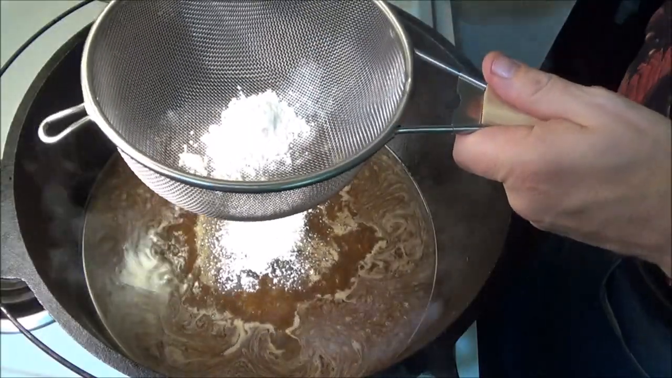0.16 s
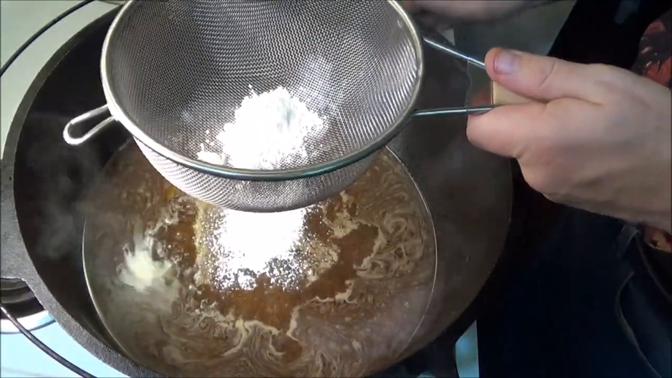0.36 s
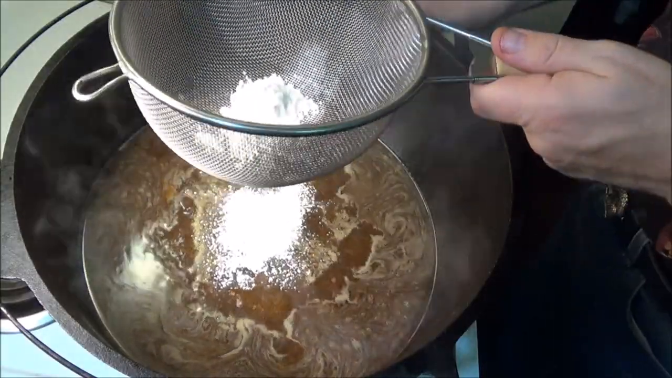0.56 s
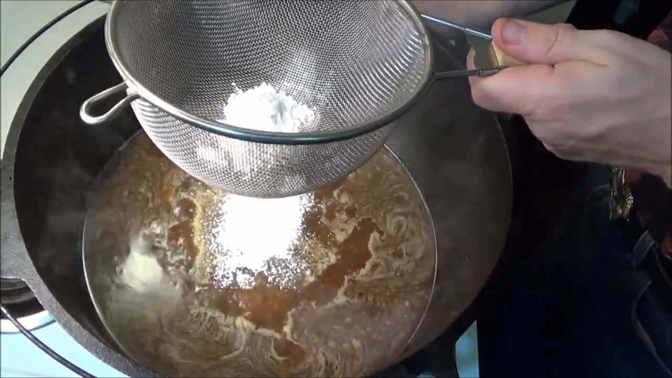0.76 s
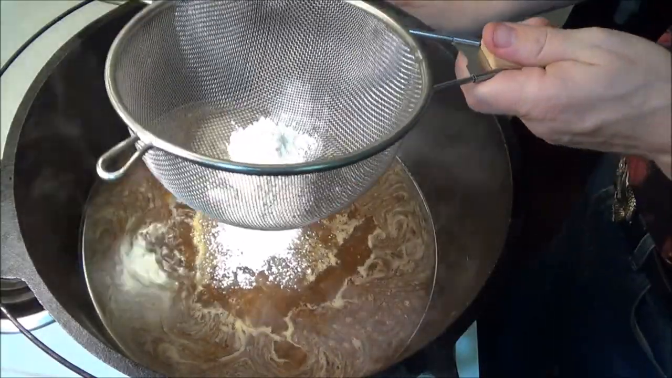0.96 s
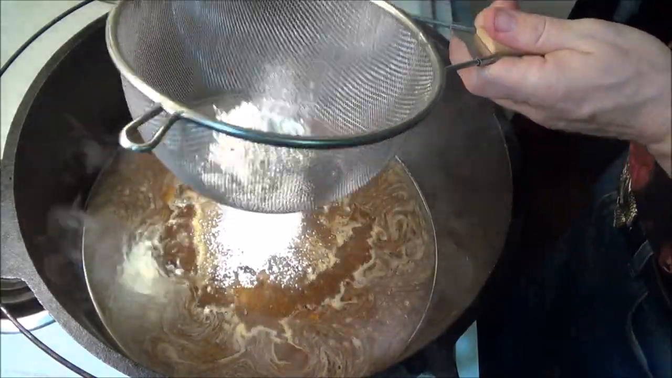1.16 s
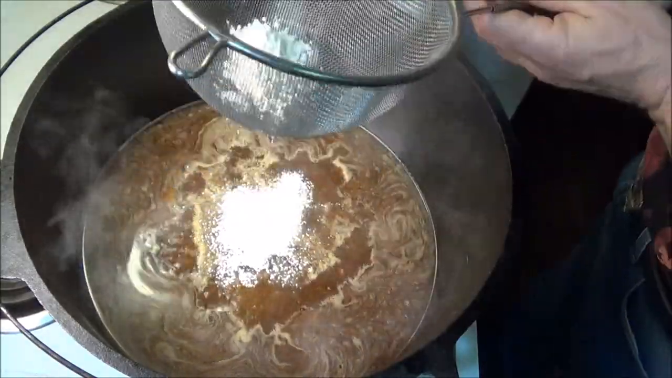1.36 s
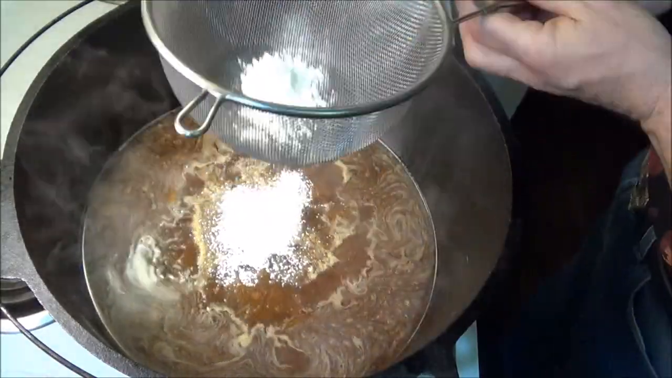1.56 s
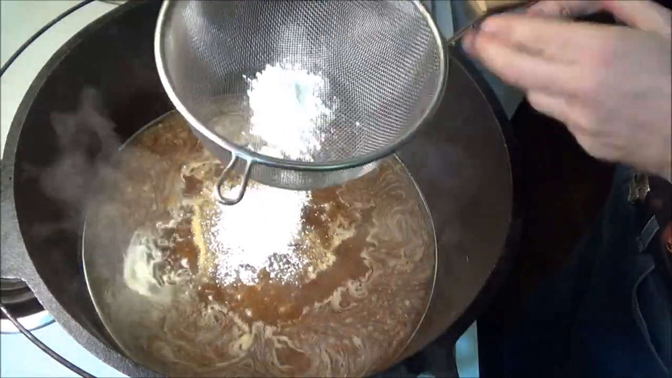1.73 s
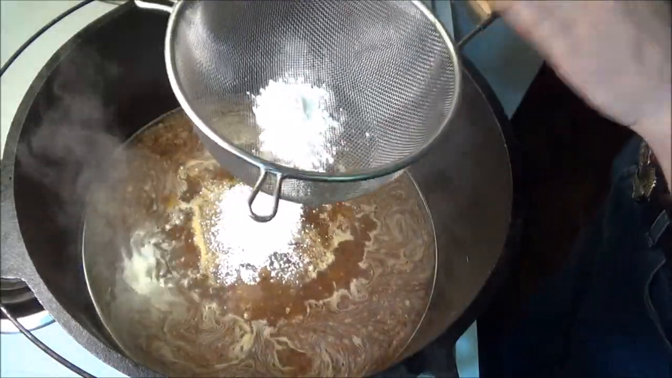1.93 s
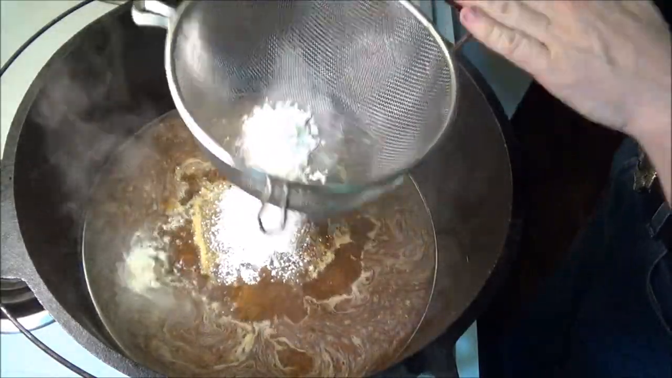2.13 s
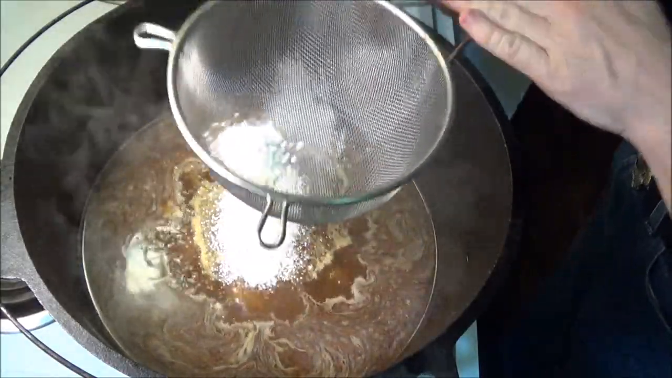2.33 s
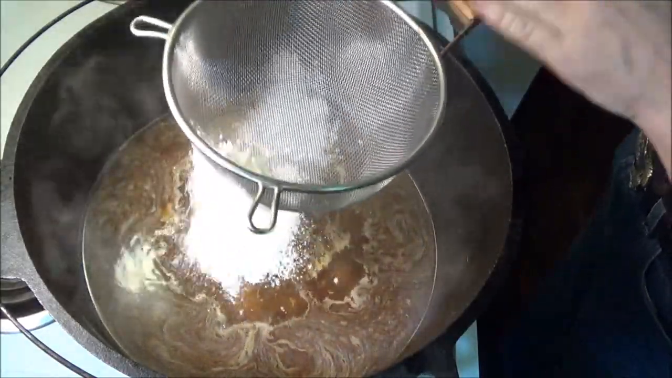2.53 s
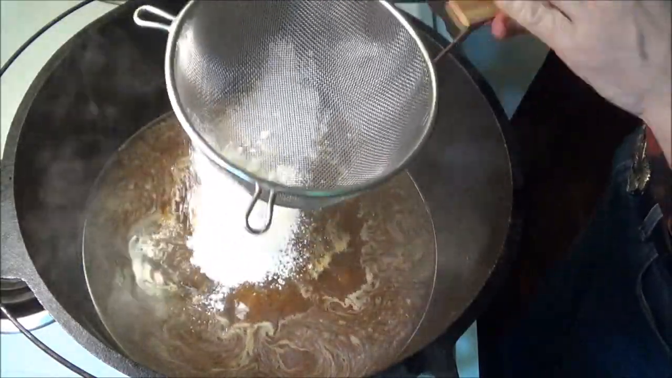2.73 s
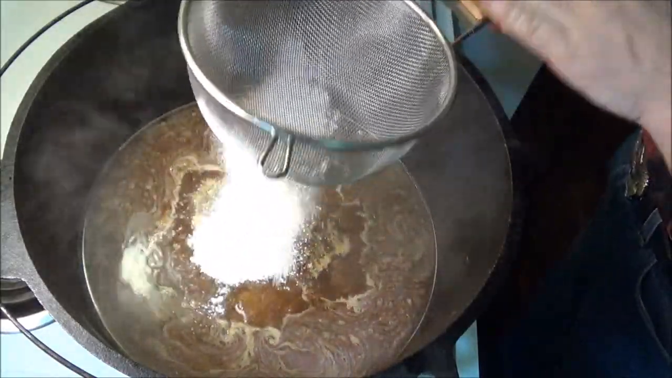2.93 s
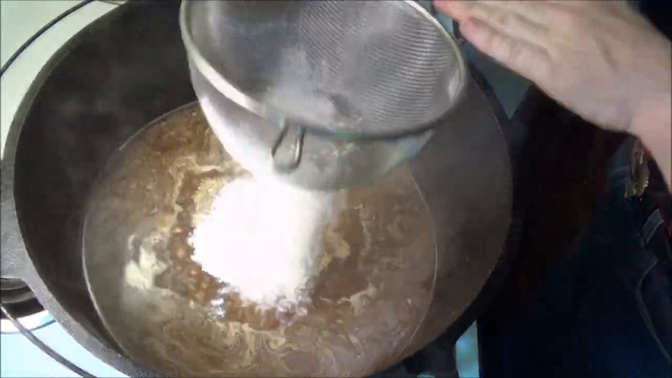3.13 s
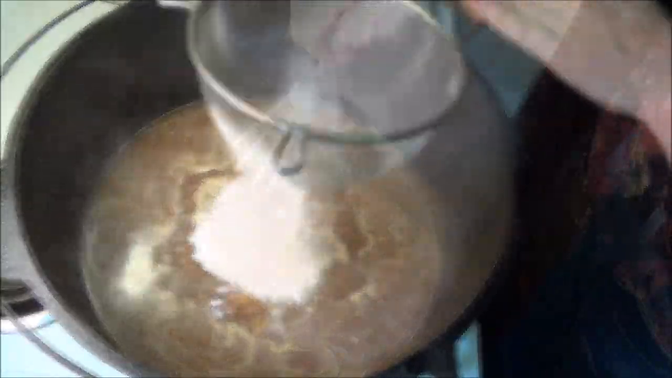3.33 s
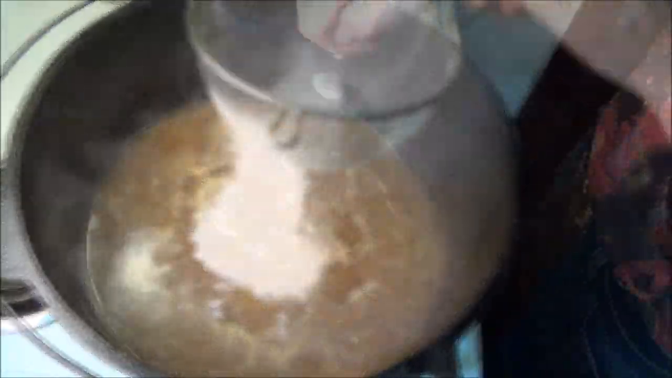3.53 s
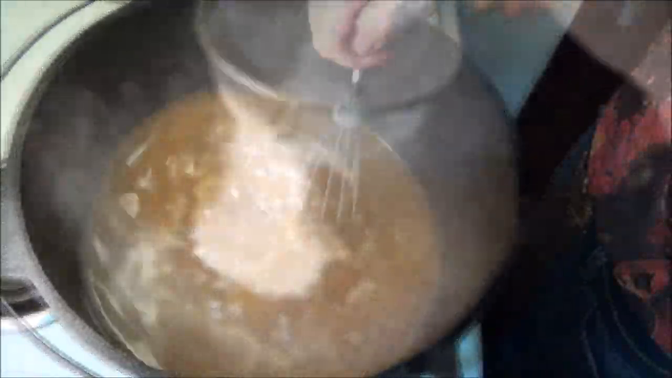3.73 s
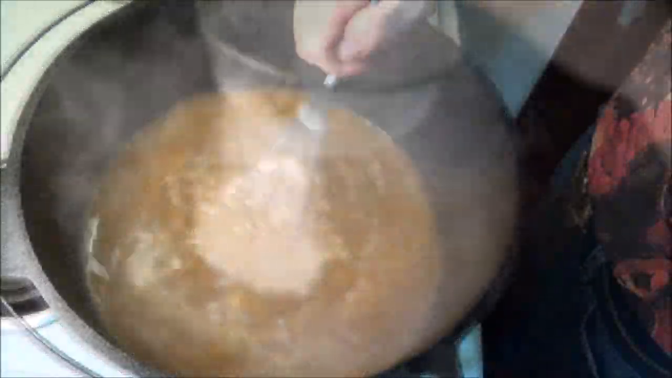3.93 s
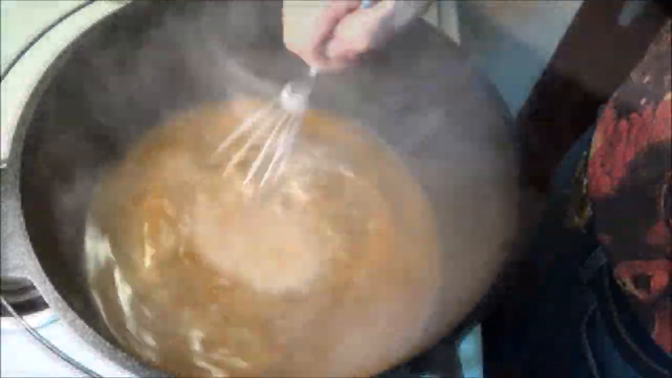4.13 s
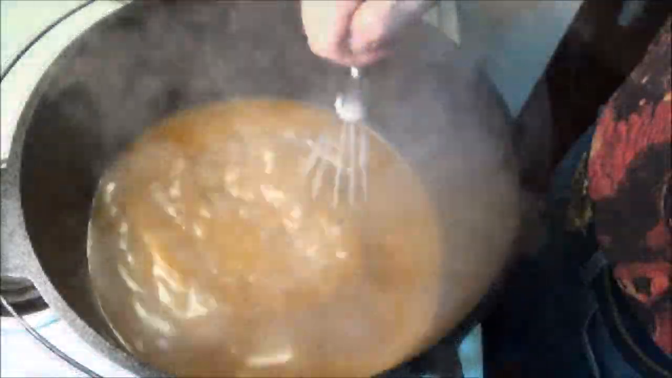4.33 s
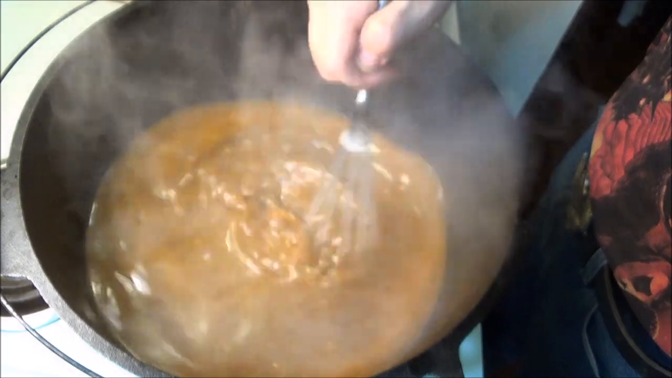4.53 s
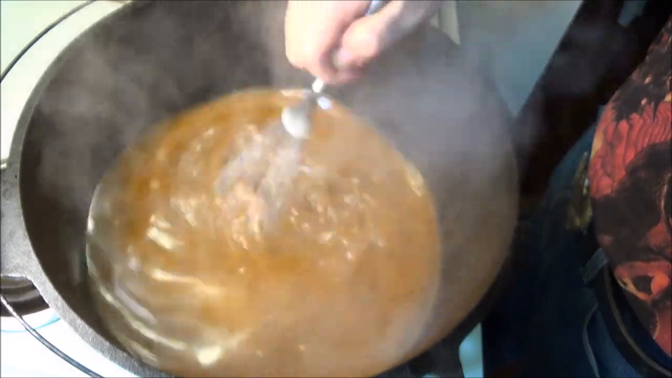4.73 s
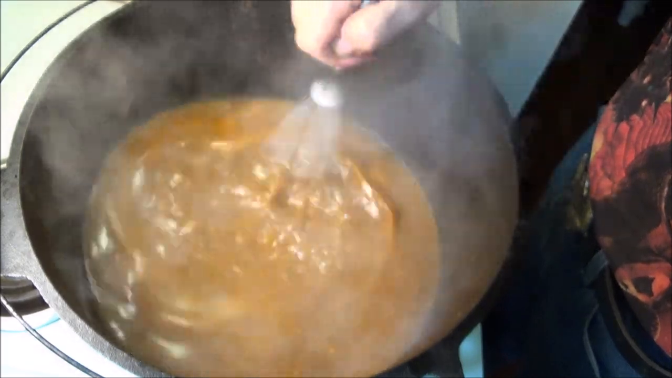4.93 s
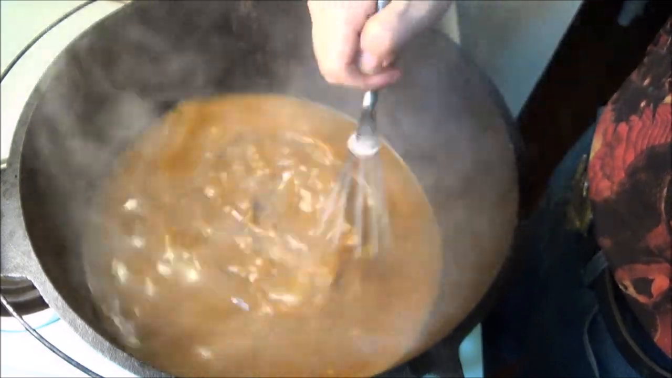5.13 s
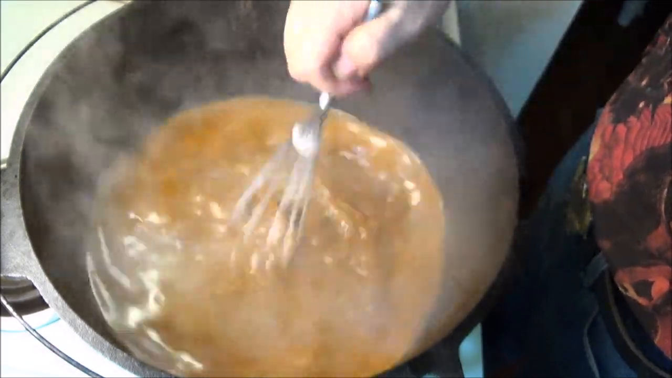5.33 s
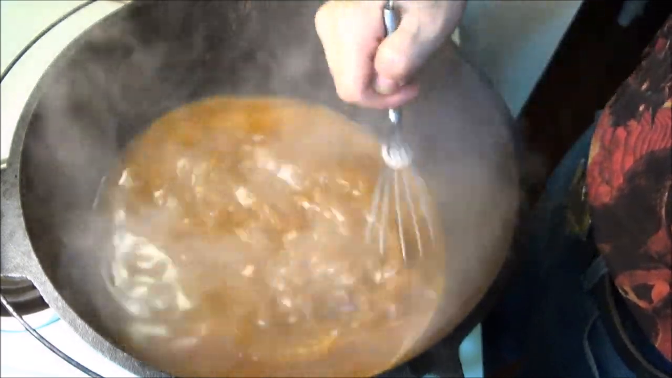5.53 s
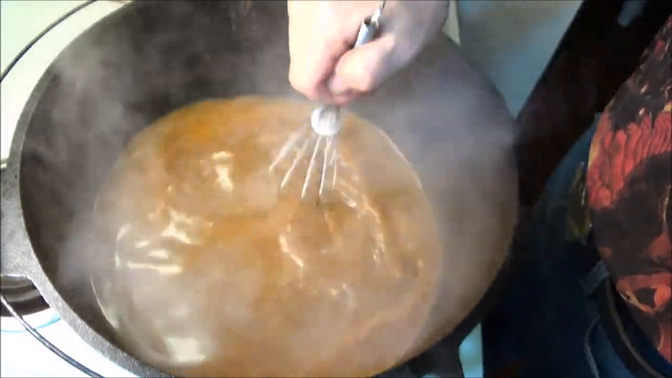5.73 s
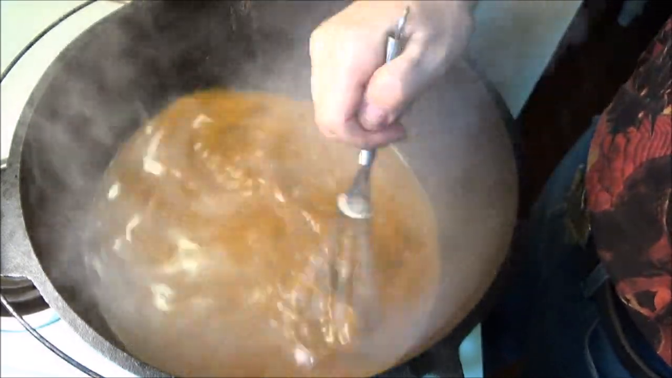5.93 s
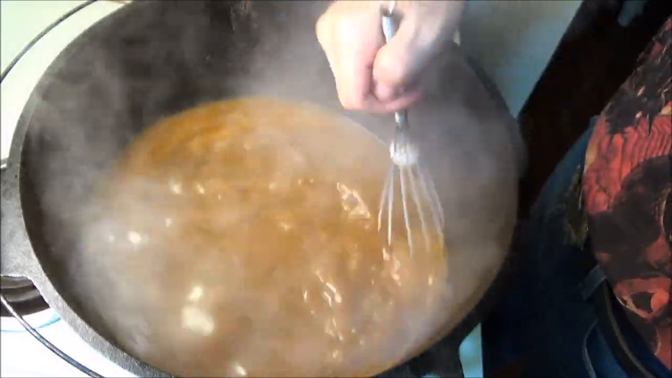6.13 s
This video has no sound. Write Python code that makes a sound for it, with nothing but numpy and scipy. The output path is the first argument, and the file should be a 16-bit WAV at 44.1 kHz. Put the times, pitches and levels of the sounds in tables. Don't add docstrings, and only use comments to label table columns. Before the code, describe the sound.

In a small hard kitchen, a soft simmer, hiss and faint mains hum are joined by two dull clatters further off. A hand then taps a wire mesh sieve in quick, even slaps with a thin metallic shimmer. A whisk follows close to the microphone, scraping rough cast iron in uneven strokes, with bright ticks, wet sloshing and a final ringing rim knock.

```python
import sys
import numpy as np
from scipy import signal
from scipy.fft import rfft, irfft, next_fast_len
from scipy.io import wavfile
from scipy.ndimage import uniform_filter1d

SR = 44100
rng = np.random.default_rng(int(sys.argv[2]) if len(sys.argv) > 2 else 0)


def generate_wav(sig):
    pcm = np.round(np.clip(np.atleast_2d(sig).T, -1, 1) * 32767).astype(np.int16)
    wavfile.write(sys.argv[1], SR, pcm)


def volts_from_decibels(level):
    exponent = np.asarray(level, float) / 20
    return 10 ** exponent


N = 272097
T = np.arange(N) / SR


def level(x, db):
    return x * volts_from_decibels(db) / np.sqrt(np.mean(x ** 2))


def add(out, start_s, x):
    k = int(start_s * SR)
    out[k:k + len(x)] += x[:N - k]


def along(points, hz):
    point_hz, value = np.transpose(points)
    return np.interp(np.log(np.maximum(hz, 1)), np.log(point_hz), value)


def colour(x, points):
    size = next_fast_len(len(x) + 4096)
    gain = volts_from_decibels(along(points, np.fft.rfftfreq(size, 1 / SR)))
    return irfft(rfft(x, size) * gain, size)[:len(x)]


def band(x, lo_hz, hi_hz):
    sos = signal.butter(2, [lo_hz, min(hi_hz, .45 * SR)], "bandpass", fs=SR, output="sos")
    return signal.sosfilt(sos, x)


def fall(t, t60):
    return np.exp(-np.log(1000) * t / t60)


def walk(rate):
    k = int(SR / rate)
    held = np.repeat(rng.standard_normal(N // k + 1), k)
    return 1.17 * uniform_filter1d(uniform_filter1d(held, k), k)[:N]


def grains(rate, spread_db, top_db=14):
    chance = rng.random((3, N))
    size_db = np.minimum(-spread_db * np.log(1 - chance[2]), top_db)
    return level((chance[0] < rate / SR) * np.sign(chance[1] - .5) * volts_from_decibels(size_db), 0)


def burst(length_s):
    t = T[:SR // 3]
    return rng.standard_normal(len(t)) * np.exp(-t / length_s) / 2


def ring(x, modes, wander_db):
    out = 0
    for hz, db, t60 in modes:
        fade = fall(1 / SR, max(t60, .005))
        wander = np.clip(walk(16), -2, 1.5)
        detune = 1 + 0.017 * wander[::-1][:len(x)]
        turn = np.exp(2j * np.pi * hz / SR * np.cumsum(detune))
        drive = x * volts_from_decibels(db + wander_db * wander[:len(x)])
        mode = signal.lfilter([1], [1, -fade], drive * turn.conj()) * turn
        out = out + np.sqrt(1 - fade) * mode.imag
    return out


def echo(x, t60):
    tail = np.zeros(SR)
    for hz in 45 * 2 ** np.arange(0, 9, .5):
        noise = band(rng.standard_normal(SR), hz / 2 ** .25, hz * 2 ** .25)
        band_t60 = along(t60, hz)
        tail += noise * fall(T[:SR], band_t60) / np.sqrt(band_t60)
    return signal.fftconvolve(x, tail / np.sqrt(np.sum(tail ** 2)))[:N]


# pitch_hz, level_db per Hz
AIR_COLOUR = [(18, -44), (30, -34), (49, -23), (71, -1.5), (91, -30), (126, -2), (148, -36), (171, -1.5),
              (252, -11), (279, -6.5), (357, -4.5), (688, -12), (762, -6), (1080, -16), (4000, -28.5),
              (5200, -44), (8800, -120)]
AIR_DB = -61
# pitch_hz, side_minus_mid_db
AIR_WIDTH = [(60, -16), (110, -14), (200, -14), (380, -14), (700, -12), (1290, -7), (2380, -7), (4400, -7),
             (8120, -14), (15000, -21)]
# pitch_hz, level_db per Hz
SIFT_COLOUR = [(710, 1), (1200, 4.5), (2100, -0.5), (2420, 1.5), (2950, -5), (9540, -4.5), (14500, -7),
               (15600, -27), (16500, -42)]
# time_s, level_db
SIFT_LEVEL = [(0.0, -57), (.8, -53.5), (1.1, -57), (1.39, -55.5), (1.58, -52.5), (1.75, -55.5),
              (2.0, -55.5), (2.35, -51.5), (3.1, -55.5), (3.2, -53), (4.5, -47.5), (6.17, -59)]
# time_s, level_db
HUM_LEVEL = [(0.0, -71), (1.7, -73), (2.35, -70), (2.9, -74), (3.25, -64), (4.05, -68), (4.38, -65),
             (4.91, -73), (6.17, -72)]


def kitchen():
    air = [level(colour(rng.standard_normal(N), AIR_COLOUR), AIR_DB + 0.5) * volts_from_decibels(0.4 * walk(2.13))
           for _ in range(2)]
    hiss = level(colour(grains(8000, 2.0), SIFT_COLOUR), -6.5)
    hiss = hiss * volts_from_decibels(np.interp(T, *np.transpose(SIFT_LEVEL)))
    hum_db = np.interp(T, *np.transpose(HUM_LEVEL)) + 2.5 + 0.48 * walk(6.2)
    hum = volts_from_decibels(hum_db) * np.sin(2 * np.pi * 60 * T)
    whine = volts_from_decibels(-73) * np.sin(2 * np.pi * 15735 * T)
    side = colour(air[1] + np.roll(hiss, SR // 7), AIR_WIDTH) + np.roll(hum, SR // 240) * volts_from_decibels(-11)
    return air[0] + hiss + hum + whine, side


# start_s, length_s, level_db
CLATTER_1 = [
    (.676, 0.023, -24.5),
    (.696, 0.024, -29),
    (.724, 0.025, -34.5),
]
CLATTER_2 = [
    (.935, 0.018, -30),
    (.945, 0.02, -28.5),
    (.967, 0.044, -53),
]
# pitch_hz, level_db per Hz
COLOUR_1 = [(47, -69), (80, -22), (140, -10.5), (445, -11), (487, -2.5), (622, -7.5), (1100, -7),
            (1740, -9), (10800, -24), (14100, -32), (16500, -75)]
COLOUR_2 = [(47, -54), (80, -7.5), (436, -10), (498, -4), (636, -10), (727, -3.5), (972, -6.5),
            (8640, -24.5), (13800, -27), (16500, -56)]
# pitch_hz, level_db, t60_s
BODY_1 = [(485, 3.5, 0.28), (1720, -9, 0.12), (138, -15, 1), (185.5, -13, 0.91)]
BODY_2 = [(752, -1, 0.15), (925, -9, 0.15), (148.2, -2, 0.45)]
# pitch_hz, t60_s
FAR_T60 = [(100, 1.7), (260, 0.85), (700, 0.41), (1840, 0.43), (4850, 0.3), (12800, 0.17)]
# pitch_hz, side_minus_mid_db
FAR_WIDTH = [(60, -10), (110, -11), (200, -11), (380, -11), (700, -8), (1290, -7), (2380, -7), (4400, -8),
             (8120, -10), (15000, -20)]


def clatter(parts, points, body):
    shake = np.zeros(N)
    for s, length, db in parts:
        shake += volts_from_decibels(db) * np.clip((T - s) / 0.0012, 0, 1) * (T < s + length)
    dry = shake * level(colour(grains(5000, 1.4, top_db=6.5), points), 0)
    dry = band(band(dry, 110, 19000), 110, 17000)
    hum = band(ring(shake * grains(5000, 1.3), body, 0) * volts_from_decibels(-4.0), 120, 17000)
    mid = hum + dry * volts_from_decibels(-4.5) + echo(dry, FAR_T60) * volts_from_decibels(-2.5)
    return mid, colour(echo(dry, FAR_T60), FAR_WIDTH) * volts_from_decibels(-1.5)


# start_s, peak_db, low_mesh_db, high_mesh_db, thump_db
TAPS = [(2.005, -38, -24, -25, -16), (2.009, -29, -6, -16, -7), (2.172, -51, -22, -25, -19),
        (2.173, -27, -32, -26, -7), (2.182, -27.5, 4, -6, -28), (2.3409, -21, -8.5, -27, -6.5),
        (2.347, -26, -16, -15, -5), (2.508, -24, -2, -28, -3), (2.513, -24, -13, -10.5, -7),
        (2.674, -40, -22, -20, -26), (2.6753, -17.5, -7.5, -4, -21), (2.850, -21.5, -25, -28, -26),
        (2.8531, -22, -8.5, -10, -28), (3.015, -30.5, -20, -23, -6.5), (3.021, -29, -6.5, -14, -16)]
# pitch_hz, level_db per Hz
SLAP = [(470, -45), (800, -19), (3100, -2), (4050, -5), (5020, -4.5), (5770, -6.5), (10900, -5),
        (15500, -30), (16500, -37)]
# centre_hz, spread_hz, level_db, t60_s
LOW_MESH = [(2160, 110, -3, 0.21), (2680, 140, -2, 0.2), (2297, 500, -3, 0.19)]
HIGH_MESH = [(3110, 110, -2, 0.24), (4320, 370, -1.5, 0.21), (5270, 280, -1, 0.22), (7250, 1200, -5, 0.17)]


def sieve():
    out = np.zeros(N)
    for s, db, low_db, high_db, thump_db in TAPS:
        hit = burst(0.0037) * volts_from_decibels(db)
        t = T[:len(hit)]
        add(out, s, colour(hit, SLAP) * volts_from_decibels(7.5) + band(hit, 130, 1500) * volts_from_decibels(thump_db + 9.5))
        for family, mesh_db in ((LOW_MESH, low_db), (HIGH_MESH, high_db)):
            for centre_hz, spread_hz, own_db, t60 in family:
                hz = centre_hz + spread_hz * rng.standard_normal((60, 1))
                crowd = np.sin(2 * np.pi * (hz * t + rng.random((60, 1)))).sum(axis=0)
                add(out, s + 0.002, crowd * fall(t, t60) * volts_from_decibels(db + mesh_db + own_db - 31.5))
    return out


def note(hz, cycles, glide):
    turns = T[:SR // 25] * hz
    shape = np.exp(-turns / max(cycles, 1)) * np.minimum(turns / 1.2, 1)
    return shape * np.sin(2 * np.pi * turns * (1 + glide * turns / cycles))


def struck(modes, db):
    t = T[:SR // 3]
    return sum(volts_from_decibels(db + own_db) * fall(t, t60) * np.sin(2 * np.pi * hz * t) for hz, own_db, t60 in modes)


# start_s, peak_db, pitch_hz
SNAPS = [(3.294, -33, 7840), (3.3188, -34, 12600), (3.3188, -20, 10700), (3.4712, -19.5, 9300),
         (3.5123, -19, 7900), (3.5553, -32, 10460), (3.5687, -25, 10200), (3.63, -30, 6100),
         (3.6475, -35, 11400), (3.6825, -24, 7650), (3.682, -24, 9470), (3.6904, -23, 5600),
         (3.7872, -36, 11100), (3.8286, -28, 9770), (3.8336, -14, 5000), (3.9409, -40, 5230),
         (3.9523, -35, 6250), (3.953, -31, 6280), (3.9675, -20, 9800), (4.0022, -17, 10700),
         (4.0616, -36, 5960), (4.0885, -36, 6090), (4.101, -31, 6400), (4.1665, -27, 9420),
         (4.191, -21, 6000), (4.2093, -23, 8000), (4.2202, -23, 5860), (4.3185, -23, 8260),
         (4.364, -20, 9100), (4.3839, -34, 9400), (4.4667, -28, 5800), (4.4828, -21, 5880),
         (4.579, -33, 11500), (4.5987, -23, 8900), (4.719, -24, 10300), (4.8286, -28, 5570),
         (4.8428, -25, 5650), (4.869, -21.5, 5600), (4.8942, -36, 7500), (4.9082, -29, 5500),
         (4.9228, -19, 9000), (4.9491, -22, 9260), (5.0404, -28, 6410), (5.1182, -27, 12100),
         (5.119, -18, 9100), (5.1596, -26, 9300), (5.1746, -22, 11400), (5.1855, -23, 8610),
         (5.2763, -26, 10600), (5.3282, -37, 9400), (5.3547, -32, 6400), (5.369, -18, 10100),
         (5.4983, -33, 7900), (5.5138, -24, 9210), (5.6111, -21, 8600), (5.634, -21, 9630),
         (5.65, -20, 9680), (5.8605, -30, 6450), (5.87, -26, 6410), (5.9194, -19, 9850),
         (3.367, -34, 2600), (3.407, -45, 2700), (3.611, -38, 10100), (3.648, -39, 8100),
         (3.893, -32, 13000), (3.909, -37, 9800), (3.923, -36, 6000), (3.934, -32, 8500),
         (4.156, -38, 7500), (4.769, -40, 6400), (4.786, -38, 11700), (4.793, -38, 8800),
         (4.809, -37, 11000), (4.869, -15.5, 11700), (5.001, -35, 11100), (5.452, -31, 10500),
         (5.478, -41, 7000), (3.968, -24, 12500), (5.2, -27, 13500), (5.215, -28, 12500),
         (5.529, -29, 13500)]
# start_s, peak_db, pitch_hz, cycles
PINGS = [(3.1709, -34, 3650, 7.5), (3.1958, -26, 1620, 9.1), (3.2113, -22.5, 1620, 10),
         (3.2646, -24, 1470, 12), (3.2821, -22, 2490, 8), (3.4143, -39, 2700, 8), (3.45, -29, 4170, 10),
         (3.4732, -24, 1600, 9.7), (3.548, -29, 1234, 9.4), (3.5683, -23, 937, 8.1),
         (3.6647, -28, 1350, 6.7), (3.6833, -22, 1350, 6.8), (3.8337, -28, 3940, 11),
         (3.941, -20.5, 1277, 9.7), (3.952, -26, 1300, 8), (4.0948, -21, 1470, 9), (4.1667, -29, 2920, 7),
         (4.191, -16, 1350, 5.3), (4.2104, -19, 2380, 7.3), (4.2304, -15.5, 2350, 6.3),
         (4.3197, -24, 2680, 5.9), (4.3862, -24, 1410, 10), (4.4696, -25, 2500, 15),
         (4.4814, -18, 2160, 7.1), (4.5988, -22, 4120, 8), (4.8366, -26, 1350, 7.5),
         (4.8435, -21, 1450, 6.6), (4.8968, -17.5, 1434, 7.6), (4.9149, -20, 2420, 8),
         (4.9407, -20, 1460, 6.8), (5.041, -17, 2295, 7.3), (5.121, -32, 2310, 6.6), (5.345, -25, 2600, 30),
         (5.3539, -23, 1077, 9.7), (5.360, -21, 1090, 4), (5.366, -16, 980, 3.3), (5.4776, -37, 1620, 8),
         (5.4936, -31, 1500, 7.3), (5.5021, -27, 1650, 10), (5.516, -28, 1720, 8), (5.6043, -23, 1720, 9.8),
         (5.75, -29, 2590, 8), (5.761, -26, 1390, 7.5), (5.821, -23, 946, 12), (6.0066, -31, 1730, 8),
         (6.0613, -21, 2330, 15), (6.103, -20, 2620, 13), (6.114, -21, 2570, 12), (6.118, -21, 4220, 16),
         (6.141, -25, 2570, 12)]
# start_s, level_db
RIM_HITS = [
    (6.057, -28),
    (6.085, -36),
]
# pitch_hz, level_db, t60_s
CLEAR_RIM = [(2314, -3.5, 0.2), (2650, -3.5, 0.25), (3160, -28, 0.19), (3451, -9, 0.63), (4360, -6, .15),
             (4646, -14, 0.32), (1350, -23, 0.14)]


def wires():
    out = np.zeros(N)
    for s, db, hz in SNAPS:
        add(out, s, note(hz, 5.5, 0) * volts_from_decibels(db - 3))
    for s, db, hz, cycles in PINGS:
        add(out, s, note(hz, cycles, 0.019) * volts_from_decibels(db - 6.5))
    for s, db in RIM_HITS:
        add(out, s, struck(CLEAR_RIM, db))
    return out


def splash(rate, lo_hz, hi_hz, cycles):
    out, t = np.zeros(N), T[:SR // 40]
    for s, pitch, size in rng.random((int(rate * N / SR), 3)):
        hz = lo_hz * (hi_hz / lo_hz) ** pitch
        age = t * hz / cycles
        bubble = np.exp(-age) * np.sin(2 * np.pi * hz * t * (1 + 0.128 * age))
        add(out, s * (N - 1) / SR, volts_from_decibels(14 * size) * bubble)
    return level(out, 0)


def patchy(x, edges_hz, flicker_db):
    parts = [band(x, lo, hi) * volts_from_decibels(flicker_db * walk(45.12)[:len(x)])
             for lo, hi in zip(edges_hz, edges_hz[1:])]
    return level(sum(parts[::2]) - sum(parts[1::2]), 0)


# start_s, length_s, bottom_drag_db, landing_db, wall_height_db
STROKES = [(3.1, 0.15, -50.5, -77, -10), (3.19, 0.13, -33, -34.5, 0), (3.471, 0.055, -29.5, -37.5, 1.5),
           (3.664, 0.01, -58, -38, 2), (3.682, 0.15, -35, -34.5, -1), (3.941, 0.16, -33.5, -32.5, -3),
           (4.167, 0.0063, -63, -53, 8), (4.19, 0.33, -37, -32, -4), (4.481, 0.016, -57, -39, -2),
           (4.597, 0.14, -37, -32.5, 1), (4.84, 0.11, -37, -35, -2), (5.04, 0.28, -43.5, -35, 0.5),
           (5.485, .025, -49, -52, -10), (5.514, 0.42, -63, -31.5, 3.5), (6.056, 0.14, -74, -47, 20)]
# peak_s, pressure_db, depth_db, wall_height_db, wire_brightness_db
PUSHES = [(3.14, -47.5, -15, -4, -2), (3.314, -35.5, -6, -0.5, 0), (3.455, -48.5, -16, 1, -3),
          (3.57, -40, -11, 1, -5), (3.727, -37.5, 1, 1, -25), (3.837, -28.5, -2.5, 1, -3),
          (3.966, -30.5, 5.5, -1.5, -3.5), (4.108, -39.5, 3.5, 3.5, -6.5), (4.234, -37, -7, 3.5, -4.5),
          (4.327, -52.5, -22, 10, 4.5), (4.407, -35, 2.5, 4.5, -2.5), (4.497, -35.5, -15, -6, -3),
          (4.668, -34.5, -2, -9, -1), (4.905, -54, -15, -5, -11), (4.962, -36, -1, -3, 1),
          (5.056, -36.5, 8, 2.5, -16), (5.19, -39.5, 10.5, 6, 6), (5.234, -34, -30, -5, 3.5),
          (5.369, -30.5, 3.5, -0.5, 0), (5.524, -55, -15, -16, 6), (5.542, -41, -3, -8, 17),
          (5.669, -34, -21, -5, -0.5), (5.775, -45.5, -1.5, -8, 1), (5.862, -39, 13.5, -12, -8),
          (5.911, -32.5, 2.5, 1, -0.5), (6.17, -34, -22, 0, -2)]
OFFSET_DB = [-2.5, -2, -1.77, -4]
HEIGHT_GAIN = [-0.076, -0.45, 0.86, 0.98]
# landing fade, push rise and release, in db per s
LANDING_DB_S = [300, 258, 257, 285]
RISE_DB_S = [137, 223, 276, 340]
RELEASE_DB_S = [276, 317, 310, 440]
START = int(STROKES[0][0] * SR)


def contact():
    t = T[START::32]
    settings = (OFFSET_DB, HEIGHT_GAIN, LANDING_DB_S, RISE_DB_S, RELEASE_DB_S)
    offset, tilt, landing, rise, release = (np.array(v)[:, None] for v in settings)
    upper = np.array([[0], [1], [1], [1]])
    out = volts_from_decibels(-56.5)
    for s, length, drag_db, land_db, height_db in STROKES:
        held = np.clip((t - s) / 0.0016, 0, 1) * volts_from_decibels(-release * np.maximum(t - s - length, 0))
        settle = volts_from_decibels(-landing * np.maximum(t - s, 0)) + volts_from_decibels(-12.5)
        wall = volts_from_decibels(land_db + tilt * height_db) * settle
        out = out + held * np.where(upper, wall, volts_from_decibels(drag_db))
    for s, db, depth_db, height_db, bright_db in PUSHES:
        touch = max([row[0] for row in STROKES if row[0] < s])
        shape_db = np.minimum(rise * (t - s), release * (s - t))
        layer_db = np.array([[depth_db], [0], [0], [bright_db]])
        out = out + (t > touch) * volts_from_decibels(db + shape_db + tilt * height_db + layer_db)
    return [np.interp(T[START:], t, row) for row in out * volts_from_decibels(offset)]


# pitch_hz, level_db, t60_s
BOTTOM = [(394, -30, 0.85), (390, -2, 0.17), (422.4, 1.5, 0.079), (495.7, -10.5, 0.34),
          (580.5, -14.5, 0.16), (735, -8, 0.52), (798.7, -3.5, 0.077), (754, -46, 0.16), (886, -10.5, 0.12),
          (892, -16.5, 0.25)]
WALL = [(1196, -8, 0.091), (1020, -9, 0.05), (1306, -1.5, 0.063), (1459, -2, 0.1), (1553, -1, 0.016),
        (1670, -4.5, 0.12), (1765, -10, 0.029), (1900, -34, 0.21), (2170, -10.5, 0.038), (2350, -3, 0.21),
        (2440, -18, 0.071), (2632, -2, 0.11), (2600, -35, 0.086), (3235, -8, 0.027), (3490, -6, 0.11),
        (3675, -5, 0.085), (4032, -4, 0.051), (4170, 0, 0.02), (4480, -8, 0.033), (5960, -13, 0.032)]
WIRES = [(6150, -42, 0.09), (7600, -1, 0.06), (8720, -22, 0.03), (9400, -28, 0.047), (10500, 6, 0.059),
         (12800, 0, 0.026)]
# pitch_hz, level_db per Hz
RASP = [(180, -19), (300, 28.5), (392, -1), (627, -12), (820, 20), (1130, 11.5), (2320, 1.5), (3190, -8.5),
        (4170, -6), (7020, -13), (10300, -8.5), (15400, -29), (16500, -97)]
DRY_HZ = [2050, 2900, 3700, 5000]
WIRE_HZ = [5000, 6500, 8000, 9500, 11500, 13500, 17000]
# start_s, peak_db, centre_hz, treble_db
TICKS = [(3.102, -48, 2610, -19), (3.135, -27.5, 3650, -17), (3.1716, -28.5, 3830, -7.5),
         (3.4505, -28, 4170, -15), (3.4724, -27, 1630, -6), (3.5707, -21, 2490, -15),
         (3.666, -23, 1300, -27), (3.674, -20.5, 2660, -17), (3.8347, -19, 3700, -14),
         (3.9424, -33, 2160, -22), (4.0608, -29, 1670, -26), (4.102, -20, 2570, -24),
         (4.1673, -21, 2900, -16), (4.2098, -18, 2430, -37), (4.3213, -19.5, 2670, -9),
         (4.3846, -35, 4160, -13), (4.468, -26, 2600, -9), (4.483, -17.5, 2110, -16),
         (4.5984, -21, 4300, -10), (4.8439, -15, 2250, -20), (4.8686, -25, 2450, -15),
         (4.897, -18, 1620, -28), (4.912, -17, 1650, -21), (5.0416, -17, 2330, -10),
         (5.12, -33, 2350, -4.5), (5.16, -20, 4000, -18), (5.3557, -16, 2500, -18),
         (5.5104, -29, 8900, -30), (5.821, -21.5, 2620, -24), (6.057, -19, 4700, -20)]
# start_s, peak_db, pitch_hz
PLOPS = [
    (4.896, -27, 260),
    (5.545, -33, 300),
    (4.485, -31, 200),
]


def whisk():
    bottom, wet, dry, wire = contact()
    wet_modes, dry_modes, wander_db = WALL[:7], WALL[7:], 6
    press = volts_from_decibels(2.2 * walk(40))[START:]
    drag, slosh, chatter, sizzle = (press * grains(rate, 3.8)[START:] for rate in (3000, 2200, 2400, 5000))
    scrape = ring(drag * bottom, BOTTOM, 3) * volts_from_decibels(-3.5)
    scrape += ring(slosh * wet, wet_modes, wander_db) * volts_from_decibels(-7.5)
    scrape += ring(chatter * dry, dry_modes, wander_db) * volts_from_decibels(-7.0)
    scrape += ring(sizzle * wire, WIRES, wander_db) * 0.13
    scrape += bottom * level(band(colour(drag, RASP), 416, 804), -12.5)
    bubbles = splash(250, 918, 2123, 3.82)[START:] * volts_from_decibels(-8.5)
    scrape += wet * (level(band(colour(slosh, RASP), 1390, 2380), -8.0) + bubbles)
    scrape += dry * patchy(colour(chatter, RASP), DRY_HZ, 5.3) * volts_from_decibels(-4.5)
    flutter = volts_from_decibels(2.64 * walk(70))[START:]
    scrape += wire * flutter * patchy(colour(sizzle, RASP), WIRE_HZ, 2.8) * volts_from_decibels(-1.5)
    snaps = patchy(grains(260, 3.5, top_db=12)[START:], WIRE_HZ[:-1] + [15000], 4)
    scrape += (wire + volts_from_decibels(-46)) * snaps * volts_from_decibels(-14)
    out, strikes = np.zeros(N), np.zeros(N)
    first_mode = signal.butter(6, 345, "highpass", fs=SR, output="sos")
    add(out, STROKES[0][0], signal.sosfilt(first_mode, scrape))
    for s, db, hz, treble_db in TICKS:
        hit = burst(0.0035) * volts_from_decibels(db)
        body = band(hit, hz / 1.25, hz * 1.25) * volts_from_decibels(7)
        add(out, s, body + band(hit, 6000, 15000) * volts_from_decibels(treble_db + 9))
        strikes[int(s * SR)] = volts_from_decibels(db)
    out[START:] += ring(strikes[START:], dry_modes, wander_db) * volts_from_decibels(-9)
    for s, db, hz in PLOPS:
        thud = np.exp(-T[:SR // 20] / .0002)
        add(out, s, band(band(thud, hz, 8 * hz), hz, 8 * hz) * volts_from_decibels(db + 15))
    return out


# pitch_hz, t60_s
NEAR_T60 = [(200, 0.32), (1000, 0.15), (4000, 0.36), (12000, 0.085)]
# pitch_hz, side_minus_mid_db
NEAR_WIDTH = [(60, -9), (110, -6), (200, -5), (380, -9), (700, -9), (1290, -7), (2380, -7.5), (4400, -9),
              (8120, -18), (15000, -17)]


def scene():
    near = whisk() + wires() + sieve()
    pot_mid = near + echo(near, NEAR_T60) * 0.24
    pot_side = colour(echo(near, NEAR_T60), NEAR_WIDTH) * volts_from_decibels(-1.5)
    first = clatter(CLATTER_1, COLOUR_1, BODY_1)
    second = clatter(CLATTER_2, COLOUR_2, BODY_2)
    mid, side = np.sum([(pot_mid, pot_side), first, second, kitchen()], axis=0)
    side += band(mid, 950, 1500) * volts_from_decibels(-14)
    return np.array([mid + side, mid - side])


def band_limit(x):
    return signal.sosfilt(signal.butter(12, 16980, fs=SR, output="sos"), x)


def record(dry):
    top_cut = signal.ellip(6, .5, 30, 15850, fs=SR, output="sos")
    mix = signal.sosfilt(top_cut, dry)
    return band_limit(mix)


dry = scene()
out = record(dry)
generate_wav(out)
```